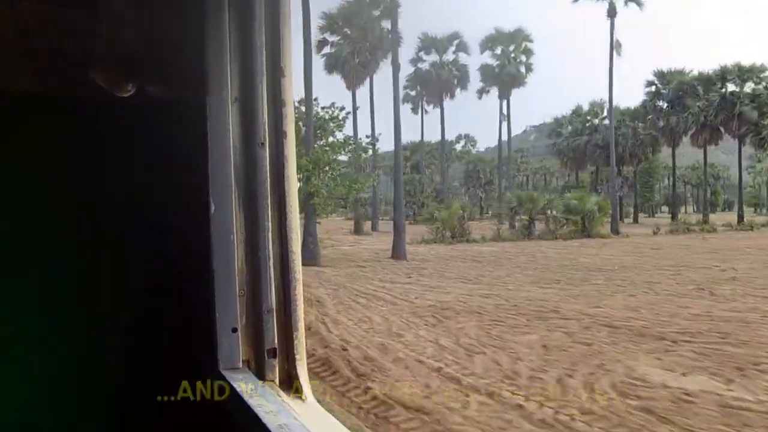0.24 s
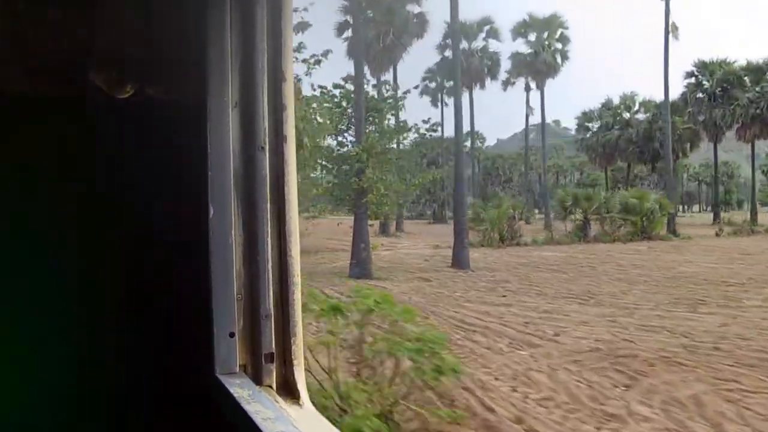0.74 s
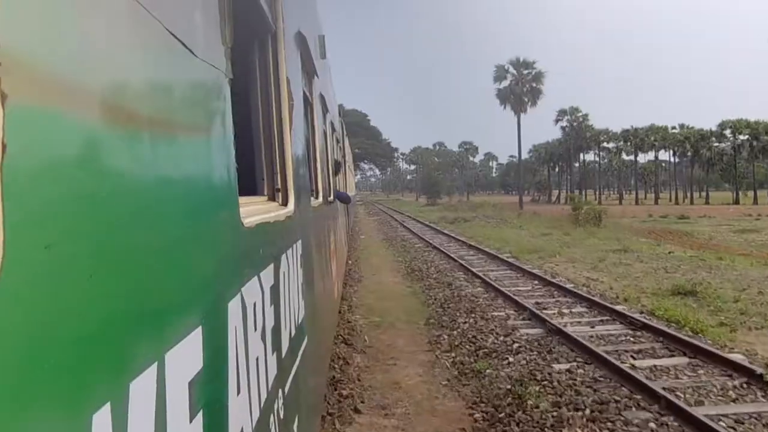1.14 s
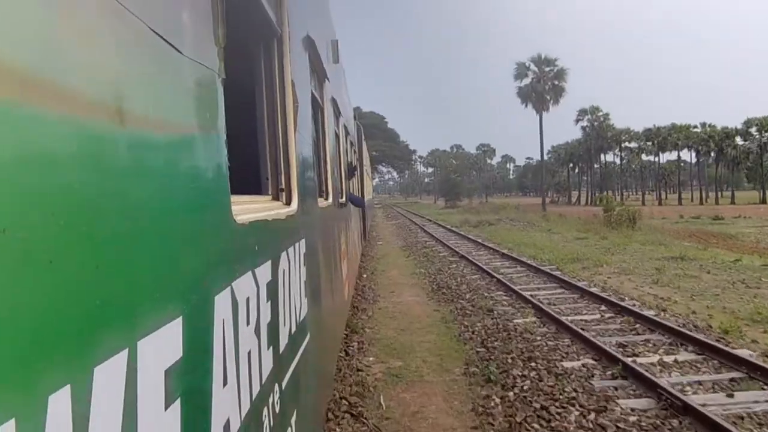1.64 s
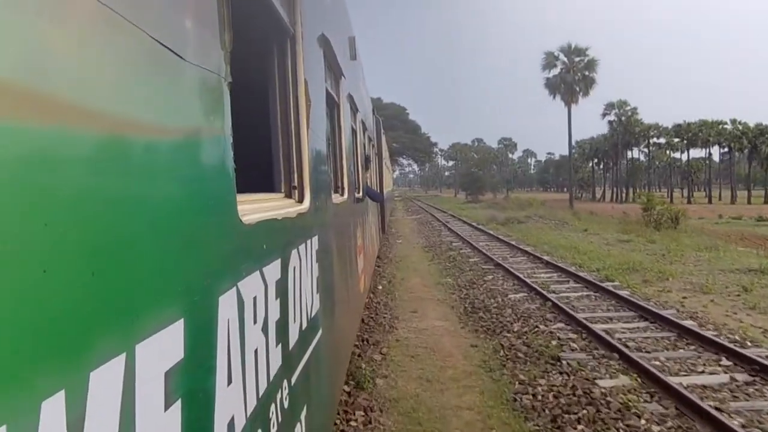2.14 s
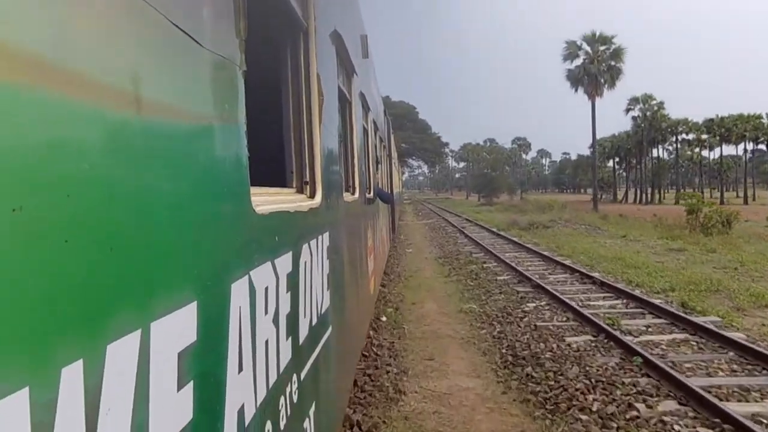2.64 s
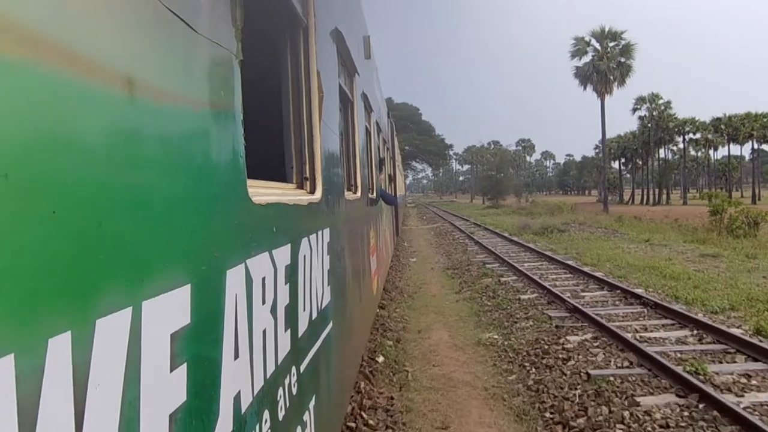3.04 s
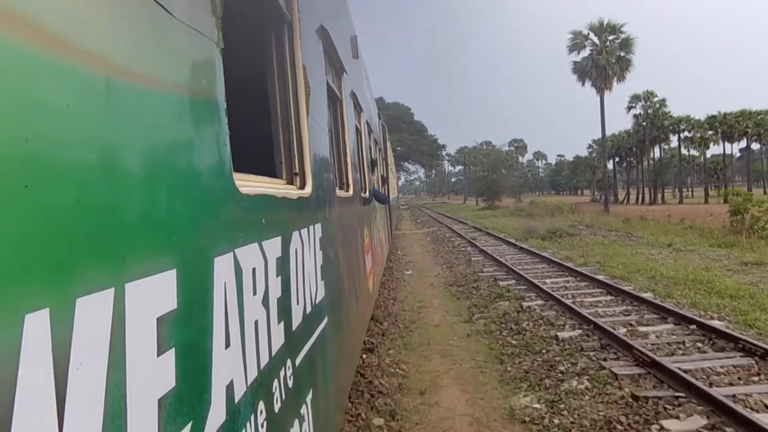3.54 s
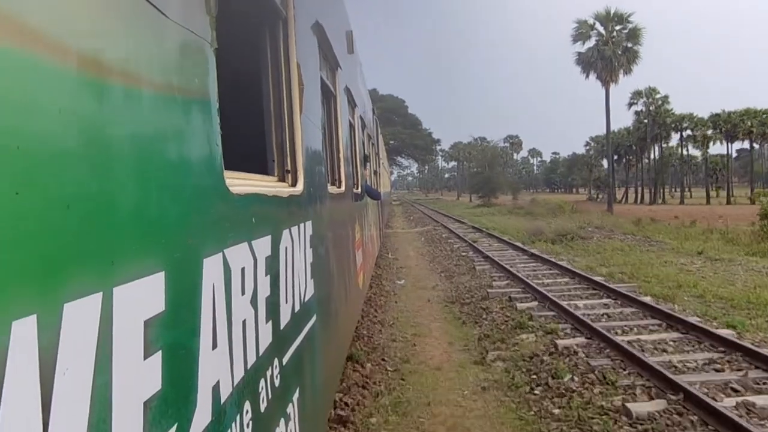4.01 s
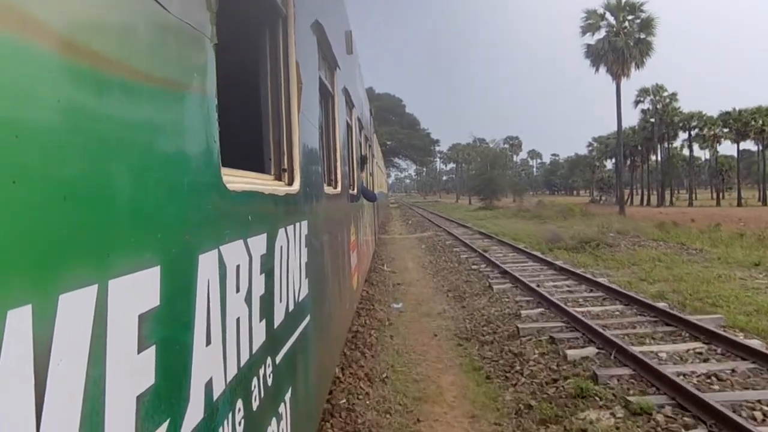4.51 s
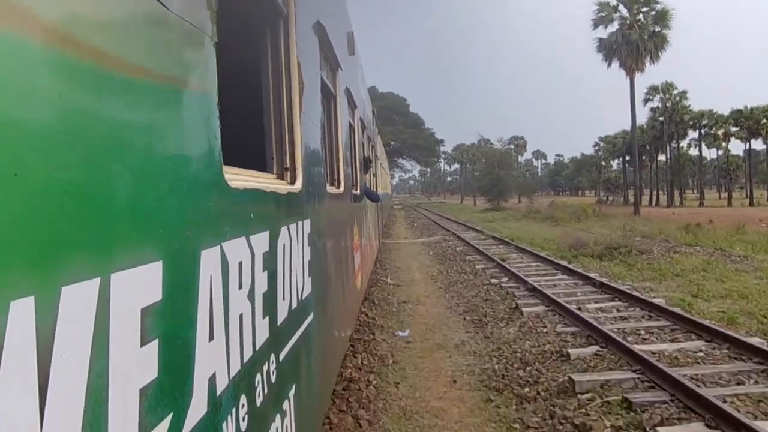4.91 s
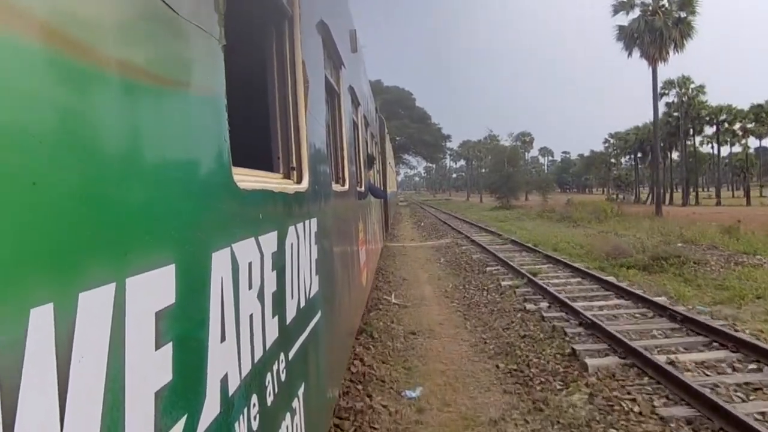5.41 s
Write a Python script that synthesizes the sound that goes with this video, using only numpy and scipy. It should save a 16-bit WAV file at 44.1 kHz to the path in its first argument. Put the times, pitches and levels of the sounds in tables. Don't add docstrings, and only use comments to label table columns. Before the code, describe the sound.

Close, small-camera sound on a train in open country. A moderate low gust opens over rolling wheels, then lulls. At one second wind slams onto the microphone, harsh and overloaded, masking the train. Irregular buffets, dull thuds and dry pops continue past five seconds, weakening towards a final instant of calmer wheel roar.

```python
import sys
import numpy as np
from scipy import signal
from scipy.fft import rfft, irfft
from scipy.io import wavfile

SR = 44100
rng = np.random.default_rng(int(sys.argv[2]) if len(sys.argv) > 2 else 0)


def ratio_of_db(decibels):
    return 10 ** (np.asarray(decibels, float) / 20)


def master(y):
    cut = np.clip(np.atleast_2d(y).T, -1, 1)
    pcm = np.round(cut * 32767)
    wavfile.write(sys.argv[1], SR, pcm.astype(np.int16))


N = 249667

MEAN_WIND_DB = -16

# time in seconds, wind strength in dB,
# eddy size in dB (heavy and low when high), shear at the port edge in dB (bright when high).
DRAUGHT = [
    (0.0, -20.5, 2.5, 2),
    (0.22, -20.5, -1, -2),
    (0.34, -26.5, -4, 3.5),
    (0.6, -24.5, 0.5, 1.5),
    (1.02, -24.5, -5.5, 0),
]
# time in seconds, wind strength, eddy size and shear in dB.
WIND = [(1.04, -11.5, 2, 1.5), (1.2, -12, 1.5, -1), (1.33, -17, -2.5, 0.5), (1.45, -18.5, 1.5, 2),
        (1.64, -12.5, 2, -1.5), (2.05, -10, 1.5, -1.5), (2.17, -16.5, -6.5, 2), (2.45, -14.5, 1.5, 0),
        (2.65, -18, -2, 0.5), (3.15, -17.5, -4, -2), (3.5, -16, 1.5, -0.5), (3.97, -15, 1.5, 1),
        (4.3, -15, -1, -1.5), (4.75, -15.5, 4.5, 1), (4.9, -18.5, -0.5, -1), (5.15, -19, -1.5, 0),
        (5.32, -18, -0.5, -3), (5.6, -19.5, -1, 0)]
# time in seconds, wind strength, eddy size and shear in dB.
STILL = [
    (5.6, -34, -3, 0),
    (5.66, -34, -3, 0),
]
# thump, rush, hiss and wheel roar in dB.
WINDOW = (-32, -20, -28.5, -21)
OUTSIDE = (-26.5, -19.5, -19.5, -26.5)
SHELTERED = (-39, -19, -25, -15)
FOLLOWS_WIND = (0.9, 0.94, 1.12, 1.09)
FOLLOWS_SIZE = (1.6, -0.19, -0.17, -0.65)
FOLLOWS_SHEAR = (0.12, -0.093, 1.2, 0.34)


def airstream():
    wind_db, size_db, shear_db = in_time([DRAUGHT, WIND, STILL])
    place_db = in_time([[(0, *place)] for place in (WINDOW, OUTSIDE, SHELTERED)])
    swing_db = np.outer(FOLLOWS_WIND, wind_db - MEAN_WIND_DB)
    swing_db += np.outer(FOLLOWS_SIZE, size_db)
    swing_db += np.outer(FOLLOWS_SHEAR, shear_db)
    return wind_db, place_db + swing_db + buffets()


# time in seconds, strength in dB, length in seconds,
# reach into the treble from 0 to 1.
BUFFETS = [(0.071, 7, 0.014, 0.08), (0.186, 1, 0.01, 0), (1.051, -1, .025, 0.3), (1.106, -10, .015, 0.2),
           (1.15, 3, 0.028, 0.3), (1.416, 0, 0.04, 0.27), (1.514, 8.5, 0.026, 0.4), (1.612, 7.5, 0.014, .5),
           (1.698, 7.5, .03, 0.6), (1.733, -2.5, .015, 0.7), (1.852, 7, 0.033, 0.6),
           (2.004, 3.5, 0.021, 0.2), (2.362, -3.5, .02, 1), (2.538, 3.5, 0.015, 0.5),
           (3.145, -2.5, 0.031, 1), (3.405, 7, 0.01, 0.2), (3.526, 7, 0.037, 0.28), (3.61, 3.5, 0.026, 0),
           (3.682, 7, 0.013, 0.5), (3.867, 7.5, 0.0069, 0.1), (4.025, 3, .03, 0.2), (4.099, -5.5, 0.042, 1),
           (4.196, 4.5, 0.062, 0.63), (4.314, -16, 0.017, 0.11), (4.378, 5, .02, 0.2),
           (4.598, 4.5, 0.0067, 0.15), (4.8, 3.5, .02, 0.2), (4.852, -2, 0.016, 0.6),
           (4.976, 8.5, 0.0067, 0.02), (5.175, 3, 0.055, 1)]


def buffets():
    t = np.arange(N) / SR
    swell_db = np.zeros((4, N))
    brightness = np.array([[0], [.5], [1], [1]])
    for s, strength_db, length_s, reach in BUFFETS:
        near = slice(max(int((s - .2) * SR), 0), int((s + .2) * SR))
        bell_db = strength_db * np.exp(-.5 * ((t[near] - s) / max(length_s, .008)) ** 2)
        swell_db[:, near] += np.clip(reach, 0, 1.3) ** brightness * bell_db
    return swell_db


# frequency in Hz, density in dB per Hz.
THUMP = [(40, -22.5), (80, -9), (150, -5), (260, 1), (400, 0.5), (600, -22.5)]


def thump(gust, level_db):
    noise = turbulence(THUMP, gust, gust_db=.5, own_db=.8, crackle=.2, per_s=150)
    return in_housing(noise, level_db - 1.2)


# frequency in Hz, density in dB per Hz.
RUSH = [(130, -22), (280, -5.5), (500, 3.5), (800, 5), (1150, -2), (1500, -6), (2500, -32)]


def rush(gust, level_db):
    noise = turbulence(RUSH, gust, gust_db=0.51, own_db=1.75, crackle=0.31, per_s=330)
    return in_housing(noise, level_db + 0.8)


# frequency in Hz, density in dB per Hz.
HISS = [(700, -34), (1200, 16.5), (1900, 2), (2600, 23.5), (3600, -13), (5000, -25), (6500, -15)]


def hiss(gust, level_db):
    noise = turbulence(HISS, gust, gust_db=1.05, own_db=.5, crackle=0.3, per_s=700)
    return in_housing(noise, level_db - 0.2)


def turbulence(spectrum, gust, gust_db, own_db, crackle, per_s):
    edges = 20 * 2 ** np.arange(0, 8.6, .5)
    happens = rng.random(N) < per_s / SR
    click_size = ratio_of_db(6.0 * np.minimum(rng.exponential(1, N), 4))
    clicks = happens * click_size * rng.choice([-1, 1], N)
    white = rng.standard_normal((2, N)) + crackle * rms_one(clicks)
    out = np.zeros(N)
    for k, (low, high) in enumerate(zip(edges, edges[1:])):
        hz = np.sqrt(low * high)
        if spectrum[0][0] <= hz <= spectrum[-1][0]:
            band_pass = signal.butter(2, [low, high], "band", fs=SR, output="sos")
            band = signal.sosfilt(band_pass, white[k % 2])
            out += band * ratio_of_db(at_hz(spectrum, hz) + gust_db * gust + own_db * drift(11))
    return out


# time in seconds, peak in dB, pitch in Hz.
THUDS = [(0.059, -22, 98), (0.703, -33, 92), (1.069, -24, 142), (1.159, -23, 152), (1.201, -24.5, 110),
         (1.618, -15, 138), (1.929, -12, 141), (2.065, -22, 150), (2.282, -20, 172), (2.413, -22.5, 156),
         (3.017, -24, 140), (3.117, -29, 115), (3.503, -23, 120), (3.567, -14, 134), (3.694, -21.5, 126),
         (3.977, -17.5, 142), (4.214, -19, 140), (4.53, -19, 136), (4.6, -13, 143), (4.66, -18, 154),
         (4.81, -14.5, 145), (5.436, -26, 85)]


def thuds():
    half, length_cycles = 1500, .6
    out = np.zeros(N)
    for s, peak_db, hz in THUDS:
        turns = np.arange(-half, half) / SR * hz
        bell = np.exp(-.5 * (turns / length_cycles) ** 2)
        push = bell * np.cos(2 * np.pi * (turns + rng.random()))
        middle = int(s * SR)
        out[middle - half:middle + half] += ratio_of_db(peak_db + 1) * push
    return out


# time in seconds, peak in dB.
POPS = [(0.7554, -11.9), (1.1978, -1.5), (1.2397, -2.1), (1.3016, -2.2), (1.5033, -1.0), (2.1245, -1.9),
        (2.2298, -1.0), (2.2704, -1.9), (2.4558, -3), (2.8141, -5.0), (2.8439, -3.7), (3.2697, -5.7),
        (3.4045, -4.4), (3.4986, -2.0), (3.64, -2.2), (3.6748, -1.2), (3.724, -2.6), (3.8795, -1.1),
        (3.9669, -2.0), (4.0251, -2.8), (4.3726, -0.8), (4.4086, -2.6), (4.5145, -2.8), (4.584, -2.0),
        (4.7127, -1.9), (4.7284, -2.2), (4.8061, -2.4), (4.8866, -4.0), (5.1313, -3.3), (5.1433, -1.8)]


def pops(wind_db):
    stray = rng.uniform(0, 1, (35, 2))
    stray_s = .05 + 5.5 * stray[:, 0]
    stray_db = wind_db[(stray_s * SR).astype(int)] + 11 + 2 * stray[:, 1]
    s, peak_db = np.transpose(POPS)
    heights = np.minimum(ratio_of_db(np.r_[peak_db, stray_db]), .85)
    return np.r_[s, stray_s], heights


# time in seconds, click level in dB, number of quick repeats.
SLAPS = [(1.0584, -31, 0), (1.0649, -29, 0), (1.1299, -30, 0), (1.5336, -28, 0), (1.6144, -20, 2),
         (1.632, -29, 0), (1.6458, -33, 0), (1.6785, -24, 0), (1.6839, -22, 2), (1.7083, -24, 0),
         (1.7178, -25, 2), (1.7633, -30, 0), (1.7697, -23, 0), (1.8011, -28, 0), (1.81, -25, 0),
         (1.8162, -28, 1), (1.8258, -24, 0), (1.83, -22, 2), (1.841, -21, 0), (1.8475, -26, 2),
         (1.8624, -28, 2), (1.8941, -27, 0), (1.9323, -30, 0), (1.9456, -28, 0), (2.0129, -24, 0),
         (2.0271, -29, 0), (2.0612, -32, 0), (2.1499, -31, 0), (2.1837, -28, 0), (3.8961, -38, 0)]


def slaps():
    spacing_s, repeat_db = .0035, -29
    hits = []
    for s, click_db, repeats in SLAPS:
        hits.append((s, click_db))
        for k in range(1, repeats + 1):
            later_s = s + k * spacing_s * rng.uniform(.85, 1.15)
            hits.append((later_s, repeat_db + rng.normal(0, 2)))
    times, clicks_db = np.transpose(hits)
    return times, 1 + ratio_of_db(1.5 * clicks_db + 26)


def lift(air, times, heights, width_s):
    half = 80
    u = np.arange(-half, half) / SR / width_s
    hump = np.exp(-.5 * u ** 2) * (1 - 0.3 * u ** 2)
    pushes = np.zeros(N)
    for s, height in zip(times, heights):
        i = round(s * SR)
        pushes[i - half:i + half] += (np.sign(air[i]) * height - air[i]) * hump
    return air + port_cut(pushes)


def sharpen(air, wind_db):
    high_pass = signal.butter(4, 3700, "high", fs=SR, output="sos")
    top = signal.sosfiltfilt(high_pass, air)
    extra_db = 0.45 * np.maximum(wind_db - MEAN_WIND_DB, -1)
    return air + top * (ratio_of_db(extra_db) - 1)


# frequency in Hz, density in dB per Hz.
ROAR = [(200, -37), (600, -14), (1100, -17.5), (1700, -21.5), (2700, 3), (3600, -6), (5200, -40.5),
        (6500, -10.5)]
# frequency in Hz, width in Hz, gain in dB.
WHEEL_RING = [(5280, 500, 5), (3750, 500, -5), (1800, 700, -5)]


def wheel_roar(gust, level_db):
    noise = turbulence(ROAR, gust, gust_db=1.1, own_db=0.0, crackle=0.31, per_s=800)
    return in_housing(modes(noise, WHEEL_RING), level_db + 0.06)


# frequency in Hz, density in dB per Hz.
RUMBLE = [(20, -7), (35, -8), (70, -10), (140, -12.5), (240, -14), (400, -27)]


def carriage_rumble(gust, thump_db):
    noise = turbulence(RUMBLE, gust, gust_db=-1.5, own_db=2.2, crackle=.05, per_s=50)
    return in_housing(noise, -35 + 0.28 * (thump_db + 32.5))


# frequency in Hz, width in Hz, gain in dB.
HOUSING = [(3009, 405, 9.5), (3385, 620, -6), (4240, 440, 9.5), (4610, 560, -3.5)]


def in_housing(layer, level_db):
    return ratio_of_db(level_db) * rms_one(modes(layer, HOUSING))


def stiffen(air):
    bend = np.maximum(np.abs(air) - .68, 0)
    return air - np.sign(air) * (bend - .2 * np.tanh(bend / .2))


# frequency in Hz, gain in dB.
PORT = [(5700, 0), (5950, -3), (6150, -13), (6320, -24), (6420, -70)]


def port_cut(x):
    hz = np.maximum(np.fft.rfftfreq(N, 1 / SR), 1)
    return irfft(rfft(x) * ratio_of_db(at_hz(PORT, hz)), N)


# frequency in Hz, density in dB per Hz.
FIZZ = [(6560, -46), (6680, -12), (7300, 1.5), (7800, -4.5), (8300, -9.5), (8900, -3), (9300, -7),
        (9900, -6.5), (10400, -19), (11500, -20.5), (13000, -34.5)]


def fizz(follow_db):
    hz = np.maximum(np.fft.rfftfreq(N, 1 / SR), 1)
    haze = irfft(rfft(rng.standard_normal(N)) * ratio_of_db(at_hz(FIZZ, hz)) * (hz > 6600), N)
    haze = peak(haze, hz=7490, width=150, gain_db=-16)
    return rms_one(haze) * ratio_of_db(-66 + follow_db + 1.9 * drift(5.9))


def self_noise():
    high_pass = signal.butter(8, 9000, "high", fs=SR, output="sos")
    return ratio_of_db(-79) * signal.sosfilt(high_pass, rng.standard_normal(N))


# start in seconds, end in seconds.
CUTS = [
    (1.02, 1.04),
    (5.601, 5.604),
]


def in_time(shots):
    t = np.arange(N) / SR
    levels = []
    for rows in shots:
        s, *columns = np.transpose(rows)
        levels.append(np.array([np.interp(t, s, column) for column in columns]))
    out = levels[0]
    for cut, after in zip(CUTS, levels[1:]):
        out = out + (after - out) * np.interp(t, cut, [0, 1])
    return out


def drift(rate):
    r = np.exp(-40 * np.pi * rate / SR)
    noise = rng.standard_normal(N // 20 + 2002)
    slow = signal.lfilter([1], [1, -2 * r, r * r], noise)[2000:]
    return np.interp(np.arange(N) / 20, np.arange(len(slow)), rms_one(slow))


def modes(x, table):
    for mode in table:
        x = peak(x, *mode)
    return x


def peak(x, hz, width, gain_db):
    w = 2 * np.pi * hz / SR
    a = ratio_of_db(gain_db / 2)
    k = np.sin(w) * width / hz / 2
    turn = -2 * np.cos(w)
    return signal.lfilter([1 + k * a, turn, 1 - k * a], [1 + k / a, turn, 1 - k / a], x)


def at_hz(points, hz):
    table_hz, db = np.transpose(points)
    return np.interp(np.log(hz), np.log(table_hz), db)


def rms_one(x):
    return x / np.sqrt(np.mean(x ** 2) + 1e-20)


def scene():
    wind_db, (thump_db, rush_db, hiss_db, roar_db) = airstream()
    gust = drift(21) + drift(90)
    air = thump(gust, thump_db) + rush(gust, rush_db) + hiss(gust, hiss_db) + thuds()
    air += wheel_roar(gust, roar_db) + carriage_rumble(gust, thump_db)
    air = sharpen(air, wind_db)
    air = port_cut(stiffen(air))
    air = peak(air, hz=698, width=16, gain_db=-22)
    air = lift(air, *pops(wind_db), width_s=.00012)
    air = lift(air, *slaps(), width_s=.00011)
    return (air + fizz(.5 * (roar_db + 24)) + self_noise())[None]


def band_limit(x):
    return signal.sosfilt(signal.butter(12, 15800, fs=SR, output="sos"), x)


def record(dry):
    mix = np.clip(dry, -.99, .99)
    return band_limit(mix)


dry = scene()
out = record(dry)
master(out)
```